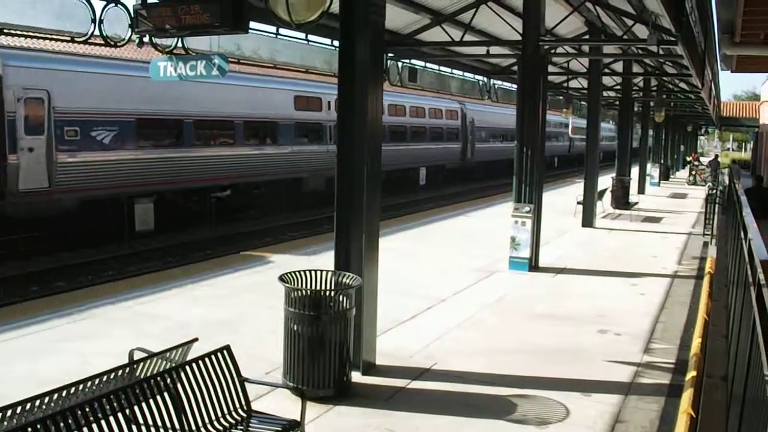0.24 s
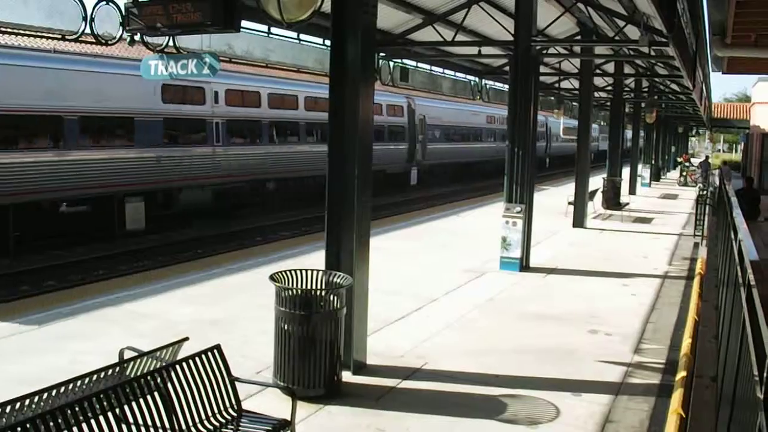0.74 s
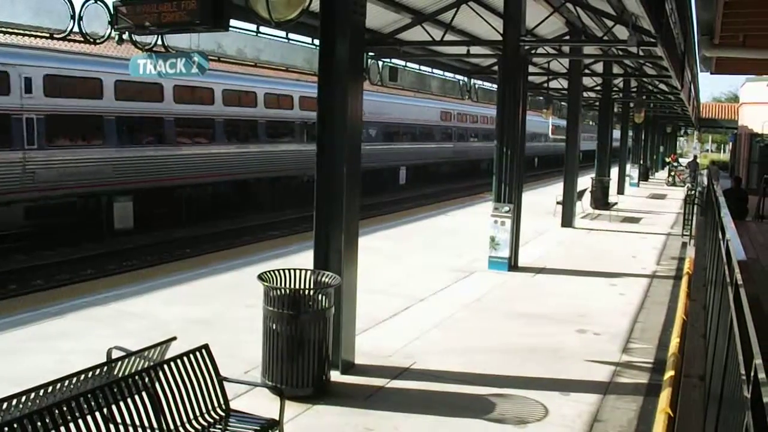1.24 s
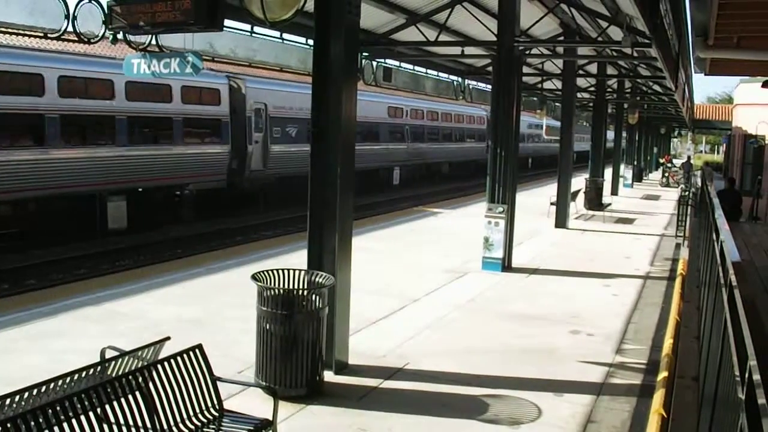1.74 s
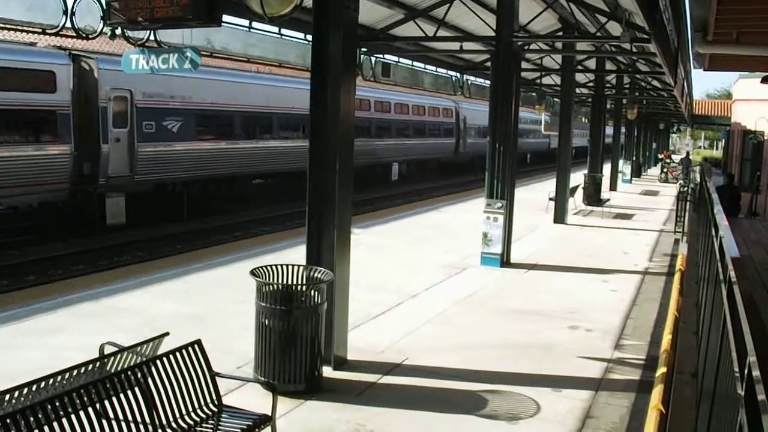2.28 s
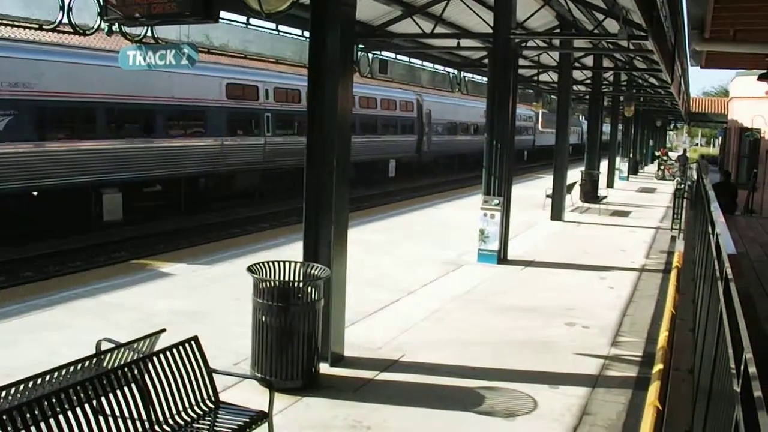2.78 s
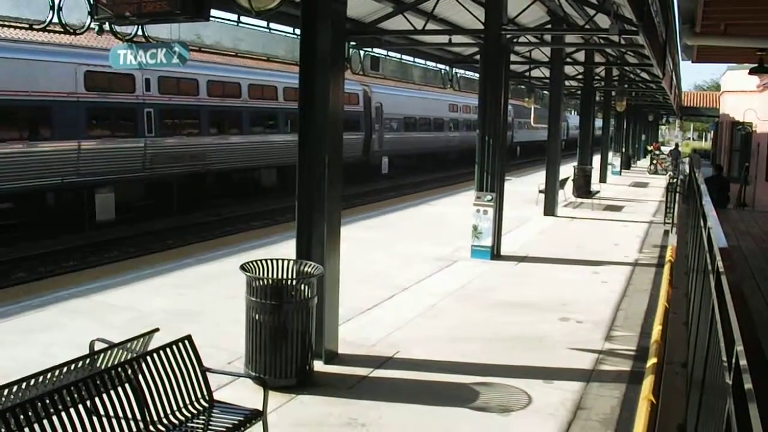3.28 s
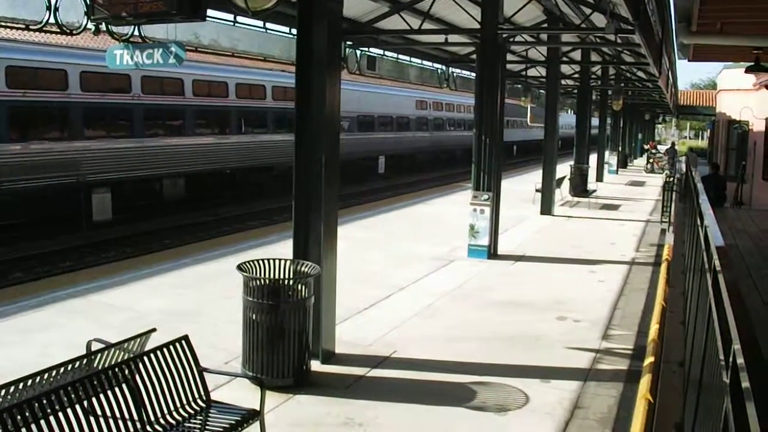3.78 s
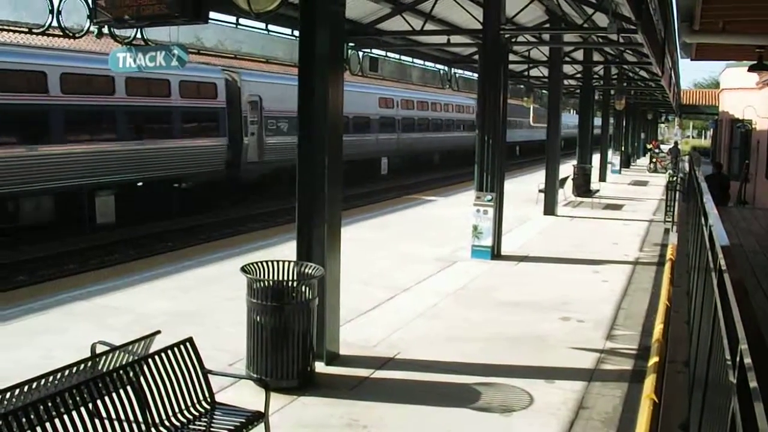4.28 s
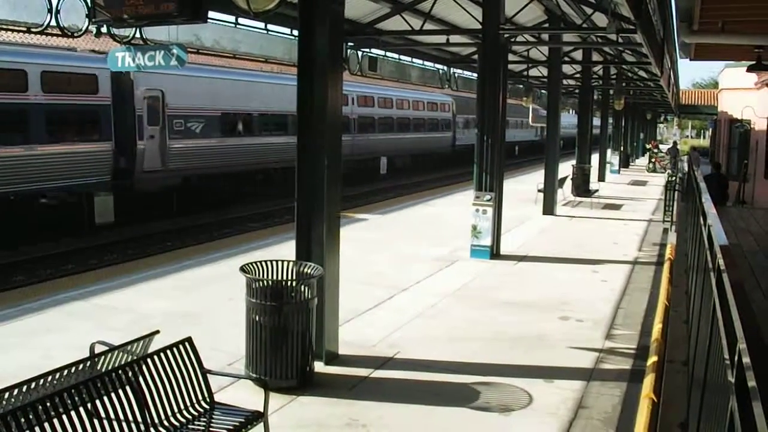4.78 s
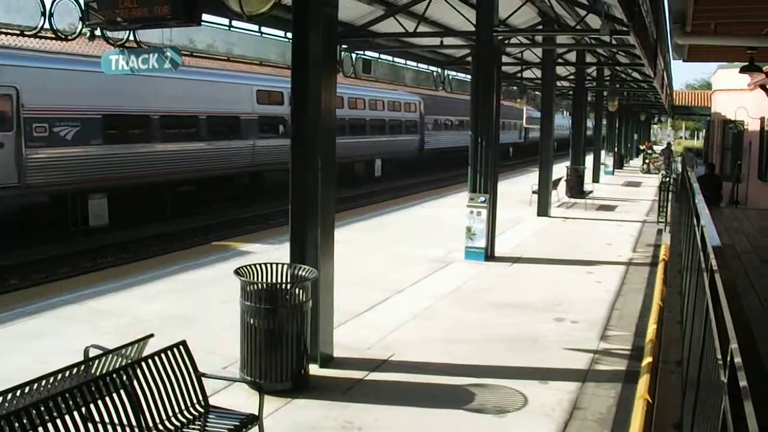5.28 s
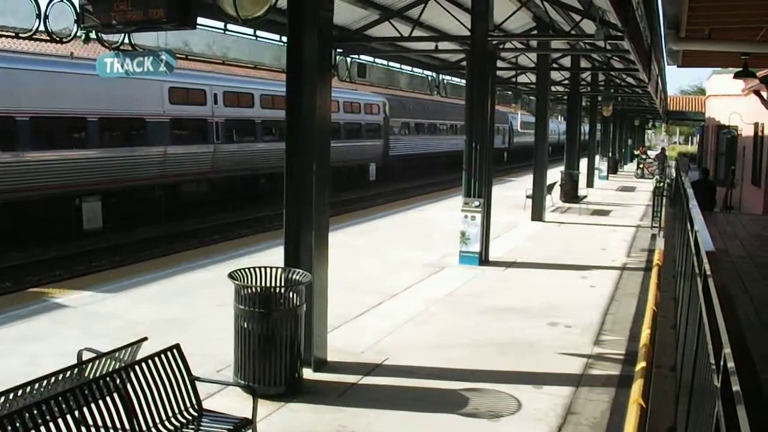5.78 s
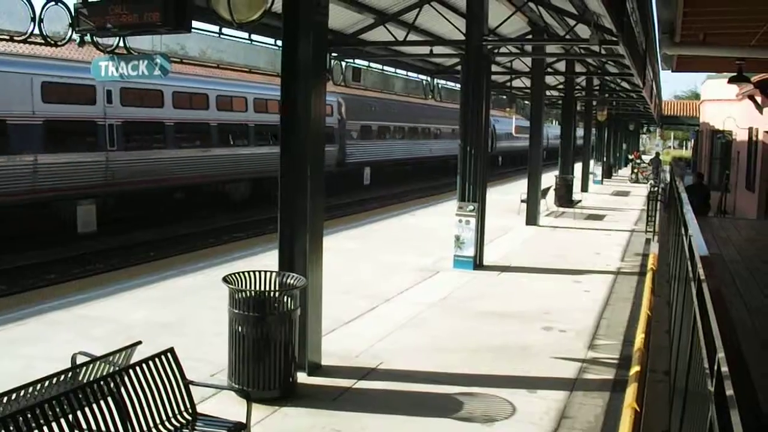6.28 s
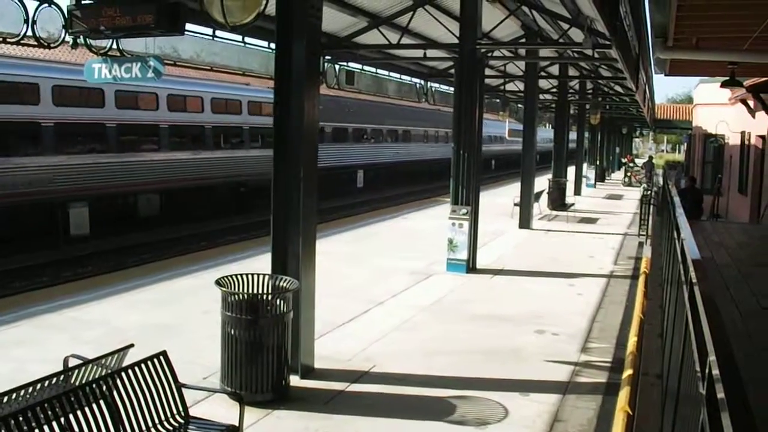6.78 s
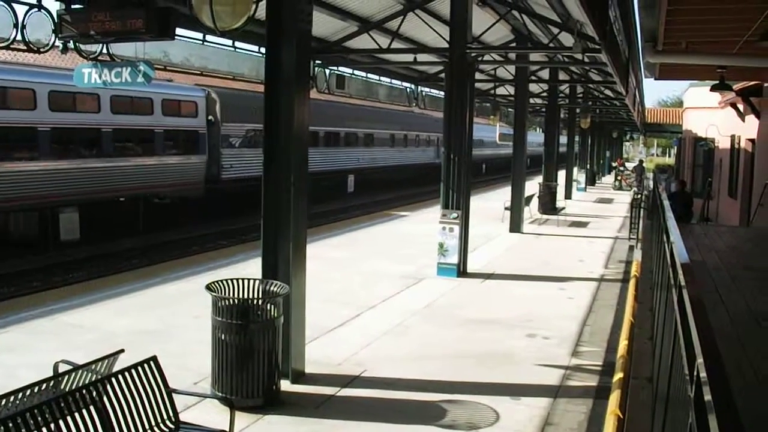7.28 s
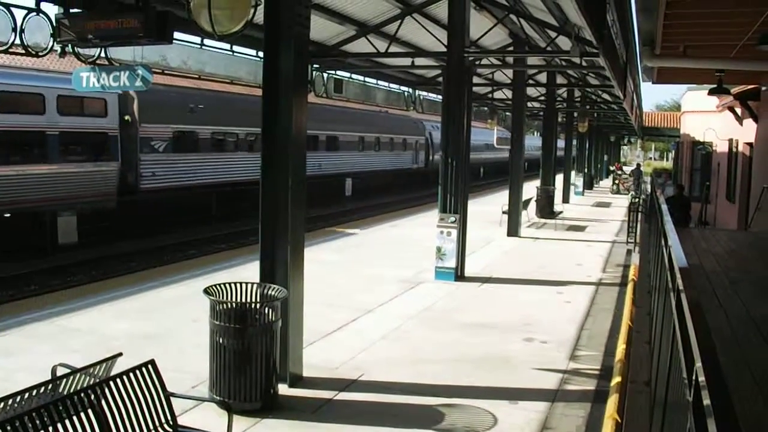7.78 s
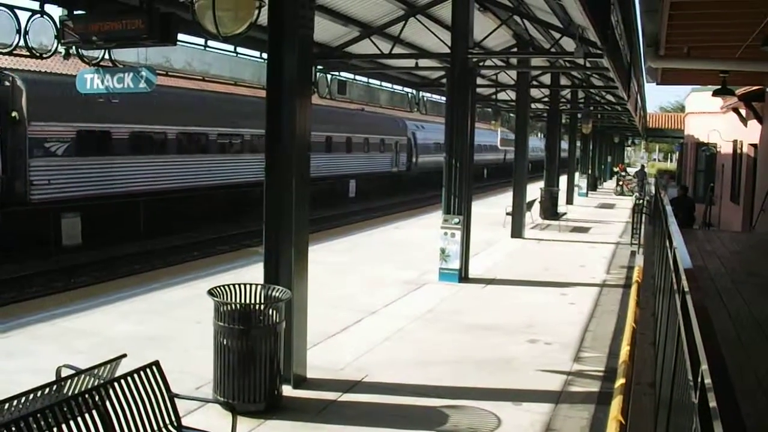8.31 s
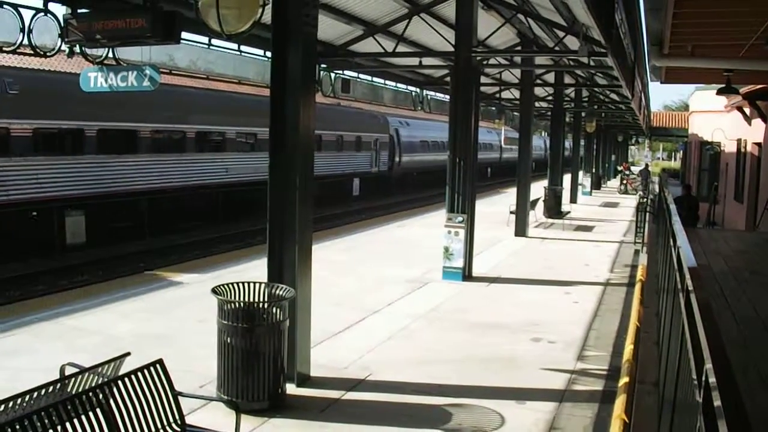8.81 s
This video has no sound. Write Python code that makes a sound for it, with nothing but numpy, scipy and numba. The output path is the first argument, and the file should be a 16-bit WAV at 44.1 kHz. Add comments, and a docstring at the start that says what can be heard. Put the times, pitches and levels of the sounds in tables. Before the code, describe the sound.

Close beside an open station platform, a passenger train rolls past with broad wheel hiss and low thumping rumble. Metallic brake ringing and short thin chirps come first; a piercing squeal bursts in after about a second, then several wavering squeals build into a dense, rough screech with sharp clicks. The rolling noise fades while the screech stays loud to the end. Handheld microphone, nearly mono, strained by the loudness.

```python
"""Wheels hiss and rumble on the rails while a passenger train brakes and its discs ring and squeal.
Wheels are coloured noise; discs, squeals and pads are wavering tones with a rough edge.
Single discs lock into squeals and chirps; later a dense band of squeaking pads with clicking slips takes over.
Sudden dips, a stepping limiter and a slightly late left treble shape the sound, heard on two channels."""
import sys
import numpy as np
from scipy import signal
from scipy.fft import rfft, irfft, next_fast_len
from scipy.io import wavfile
from scipy.ndimage import uniform_filter1d
from numba import njit

SR = 44100
rng = np.random.default_rng(int(sys.argv[2]) if len(sys.argv) > 2 else 0)


def store_pcm(level_fs):
    """Save levels as 16-bit WAV."""
    pcm = np.round(np.clip(level_fs, -1, 1) * 32767).astype(np.int16)
    wavfile.write(sys.argv[1], SR, np.atleast_2d(pcm).T)


N = 399105
TIME = np.arange(N) / SR

# Loudness of the squeaking pads. Each row: time in seconds, level in dB.
PAD_LEVEL = [(0, -53), (.55, -33), (1.1, -30.5), (2.2, -29.5), (3.4, -20.5), (3.9, -19.5), (5.4, -17.5),
             (6.3, -19.5), (6.55, -15), (7.6, -15), (7.95, -16.5), (8.5, -15.5), (9.05, -17.5)]
# Where the squeaks lie in pitch. Each row: frequency in Hz, relative strength in dB per Hz.
PAD_BAND = [(2560, -38.5), (2720, -2.5), (2850, 0.5), (3050, -4), (3300, 2), (3700, 0), (4000, -4.5),
            (4350, -12.5), (4600, -28.5), (4720, -40.5)]


def undb(db):
    """Turn decibels into an amplitude factor."""
    return 10 ** (np.asarray(db) / 20)


def unit(x):
    """Scale a signal to an average strength (rms) of 1."""
    return x / np.sqrt(np.mean(np.abs(x) ** 2))


def read(table):
    """Draw each column of a table as a curve over time; the end values are held."""
    s, *columns = np.transpose(table)
    return [np.interp(TIME, s, c) for c in columns]


def walk(rate):
    """Smooth chance curve that changes about rate times a second, with a spread of 1."""
    # made at a sixteenth of the sample rate, smoothed three times, then filled in
    size = max(int(SR / 16 / rate), 1)
    x = rng.standard_normal(N // 16 + 2)
    for _ in range(3):
        x = uniform_filter1d(x, size)
    return np.interp(np.arange(N) / 16, np.arange(len(x)), unit(x))


def noise(gain_at, source=None):
    """Noise (or another source) whose frequencies are weighted by gain_at(Hz), at rms 1."""
    size = next_fast_len(N)
    hz = np.maximum(np.arange(size // 2 + 1) * SR / size, 1)
    source = rng.standard_normal(size) if source is None else source
    spectrum = rfft(source, size) * gain_at(hz)
    return unit(irfft(spectrum, size)[:N])


def colour(points, hz):
    """Amplitude at hz of a spectrum given as (Hz, dB) points; practically silent beyond its ends."""
    f, db = np.transpose(points)
    return undb(np.interp(np.log(hz), np.log(f), db, -120, -120))


def squeak(hz, width_hz, clean, over_db):
    """Stick-slip on one mode: a tone that partly loses its phase, with the octave of its lopsided cycle."""
    # a steady part (clean) plus a part that wanders about width_hz times a second
    z = clean + walk(width_hz) + 1j * walk(width_hz)
    z = unit(z) * np.exp(2j * np.pi * np.cumsum(hz) / SR)
    octave = z * z / (np.abs(z) + 1e-9)
    return np.sqrt(2) * (z + undb(over_db) * octave).real


def wheels():
    """Hiss in octave bands that flicker alone, over the thumping rumble of the bogies."""
    # Each row: time in seconds, wheel hiss level in dB, rumble level in dB.
    rolling = [(0, -19.5, -18.5), (.7, -21, -18.5), (1.2, -20.5, -20), (1.7, -19.5, -21), (2.2, -24, -25.5),
               (3, -22.5, -23), (3.8, -23, -24.5), (4.4, -24.5, -26.5), (5, -26.5, -27.5),
               (5.6, -30.5, -30), (6.2, -34, -34.5), (6.6, -30.5, -31.5), (7.2, -34, -35.5),
               (7.85, -36, -34), (8.05, -38.5, -35.5), (8.6, -40.5, -38.5), (9.05, -42.5, -41)]
    # Hiss, then rumble spectrum. Each row: frequency in Hz, relative strength in dB per Hz.
    hiss_band = [(150, -30), (250, -4), (340, -5), (520, -3.5), (750, -6.5), (1250, -4.5), (2100, -7),
                 (3040, -3.5), (3860, -7.5), (4680, -9.5), (5860, -22.5), (6340, -20), (7100, -22.5),
                 (7810, -23), (10300, -34.5), (11500, -67.5), (14900, -93)]
    rumble_band = [(11, -47.5), (18, 2), (38, -14), (75, 2.5), (114, -2.5), (145, -1.5), (193, -1.5),
                   (235, -7), (271, -4), (329, -19), (400, -27), (520, -36.5), (880, -120)]
    # Low thumps that swell the rumble. Each row: time in seconds, rise in dB.
    thumps = [(1.02, 4.4), (1.55, 4.6), (2.55, 6.4), (3.47, 5), (3.88, 9.7), (4.43, 6), (4.58, 5),
              (5.5, 4.1), (6.2, 12), (6.57, 6.6), (8.3, 4), (8.93, 5.8)]
    thump_s = .018  # sets the length of a swell, in seconds

    hiss_db, rumble_db = read(rolling)
    grid = np.arange(20., SR / 2, 20.)
    hiss = 0
    for centre in 250 * 2. ** np.arange(6):
        # neighbouring bands overlap and fade into each other
        share = lambda hz: np.cos(np.pi / 2 * np.clip(np.log2(hz / centre), -1, 1))
        weight = np.sqrt(np.sum((colour(hiss_band, grid) * share(grid)) ** 2))
        band = noise(lambda hz: colour(hiss_band, hz) * share(hz))
        hiss = hiss + weight * undb(.36 * walk(11.6)) * band
    thump_db = sum(db * np.exp(-((TIME - s) / thump_s) ** 2) for s, db in thumps)
    rumble = undb(1.1 * walk(16)) * noise(lambda hz: colour(rumble_band, hz))
    return undb(hiss_db + .83 * walk(27)) * unit(hiss) + undb(rumble_db + thump_db) * rumble


def discs():
    """Rubbing noise rings every disc mode; each wavers in level and pitch; they die away as the train slows."""
    # Ways a disc can ring. Each row: frequency in Hz, relative width in Hz, relative level in dB.
    modes = [(2960, 370, -8), (3830, 240, -3), (4190, 48, -3), (4366, 170, -5.5), (4920, 150, -9.5),
             (5196, 130, -9.5), (5575, 360, -10), (5860, 210, -20), (7010, 480, -12.5), (8560, 1200, -24),
             (10460, 900, -37.5)]
    # Loudness of all the ringing. Each row: time in seconds, level in dB.
    ring_level = [(0, -20), (.9, -19.5), (1.35, -20), (1.65, -20.5), (2, -25), (2.5, -24.5), (3.05, -26),
                  (3.5, -35), (4.1, -45), (4.8, -42.5), (5.6, -40.5), (6.4, -45), (9.05, -79.5)]
    ring = 0
    for hz, width, db in modes:
        wander = hz * (1 + .006 * walk(2.5))
        tone = squeak(wander, 1.5 * width, clean=.29, over_db=-58)
        # wider modes carry more sound
        ring = ring + undb(db + 2 * walk(11)) * np.sqrt(width) * tone
    return undb(read(ring_level)[0] + .81 * walk(9.7)) * unit(ring)


def pads():
    """Many pads squeak side by side in pitch, each coming and going; all sink in pitch as the train slows."""
    # Octave of a squeak. Each row: squeak frequency in Hz, octave level against the squeak in dB.
    octave_level = [(2500, -39), (2900, -23), (3300, -25.5), (3750, -17), (4300, -12), (4800, -13.5)]
    sink = 1.04 - .005 * TIME
    crowd = 0
    for hz in np.geomspace(PAD_BAND[0][0], PAD_BAND[-1][0], num=30):
        over_db = np.interp(hz, *np.transpose(octave_level))
        drift = sink * (1 + .008 * walk(1.5))
        # higher squeaks lie further apart in Hz, so each stands for a wider slice
        strength = colour(PAD_BAND, hz) * np.sqrt(hz)
        crowd = crowd + strength * undb(2.8 * walk(8)) * squeak(hz * drift, 260, .62, over_db)
    # grip comes and goes quickly for all pads together
    return undb(read(PAD_LEVEL)[0] + 1.5 * walk(27)) * unit(crowd)


def slips():
    """All pads slip together: a hail of small random jolts in their band, plus set hard ones of a few cycles."""
    # The hardest slips. Each row: time in seconds, peak level in dB.
    jolts = [(3.275, -4.5), (3.944, -4), (4.594, -6), (4.957, -1.5), (5.118, -8), (5.252, -9), (5.396, -13),
             (5.623, -2), (6.642, -9.5), (6.813, 1), (7.293, -5), (7.571, -9), (7.578, -1.5), (7.743, -5),
             (7.821, -9), (7.934, 0), (8.191, -6), (8.288, -18), (8.402, -7), (8.571, -4), (8.686, -4),
             (8.718, -5.5), (8.870, -6.5), (8.952, -9)]
    slips_per_s, spread_db, small_db = 400, 2, -8  # small_db is set against the pad level
    jolt_hz, jolt_s = 3400, .0004
    when, size, sign = rng.random((3, N))
    # most small slips are weak, a few much stronger; each pushes up or down
    small = (when < slips_per_s / SR) * undb(-spread_db * np.log(1 - size)) * np.sign(sign - .5)
    hard = 0
    for s, db in jolts:
        swell = np.exp(-((TIME - s) / jolt_s) ** 2)
        hard = hard + undb(db) * swell * np.cos(2 * np.pi * jolt_hz * (TIME - s))
    return undb(read(PAD_LEVEL)[0] + small_db) * noise(lambda hz: colour(PAD_BAND, hz), small) + hard


def squeal(pitch, table, width_hz, clean, over_db, flutter_db):
    """One disc sings while its level table lasts; pitch and grip waver."""
    hz = read(pitch)[0] * (1 + .003 * walk(9.25))
    start, end = table[0][0], table[-1][0]
    on = np.interp(TIME, [start - .06, start, end, end + .27], [0, 1, 1, 0])
    flutter = unit(undb(flutter_db * walk(9.2)))
    return on * flutter * undb(read(table)[0]) * squeak(hz, width_hz, clean, over_db)


def squeals():
    """Single discs lock into stick-slip, each with its own pitch path, purity and flutter."""
    # Pitch of each squeal. Each row: time in seconds, frequency in Hz.
    low_hz, mid_hz, high_hz = [(0, 3095), (1, 3090), (2.2, 3055), (3.4, 3022), (4.4, 2993), (5.8, 2958),
                               (6.2, 2938), (6.6, 2906), (7.4, 2865), (8.2, 2872), (9.05, 2852)], [(0, 3862), (.6, 3835), (1, 3780), (1.4, 3727), (1.75, 3720),
                                               (1.85, 3665), (1.95, 3705), (2.1, 3665), (2.22, 3700),
                                               (2.4, 3632), (3, 3642), (3.4, 3620), (3.8, 3668),
                                               (4.2, 3648), (6.9, 3628)], [(0, 7055), (.6, 6987), (1, 6915),
                                                               (1.4, 6869), (2.2, 6806), (5.1, 6793)]
    brief_hz, late_hz = [(1.1, 4385), (1.8, 4393), (3.2, 4380)], [(4.9, 3402), (5.9, 3398), (6.2, 3360), (6.6, 3337), (7.4, 3316),
                                           (8, 3314)]
    side_hz, faint_hz = [(2.6, 2900), (4, 2893), (5.4, 2915)], [(3.2, 4740), (4.6, 4715), (5.2, 4737), (7.1, 4580), (8, 4590)]
    # Loudness of each squeal. Each row: time in seconds, level in dB.
    low, mid, high = [(0, -43), (.95, -32.5), (1.4, -26.5), (2, -21), (2.7, -21.5), (3.1, -20), (3.9, -16),
                      (4.3, -18.5), (4.6, -13), (5.3, -13.5), (5.65, -11.5), (6.3, -17), (6.8, -14.5),
                      (7.55, -16.5), (8, -17), (8.5, -16.5), (9.05, -20.5)], [(0, -25.5), (.7, -26), (1.17, -28), (1.34, -11), (1.72, -32.5),
                                          (1.85, -8), (1.91, -16.5), (2.05, -13.5), (2.4, -13),
                                          (2.75, -16.5), (2.83, -28), (2.97, -19), (3.11, -26),
                                          (3.2, -16.5), (3.55, -19), (3.75, -26), (4, -21.5), (4.55, -25),
                                          (5, -27.5), (5.65, -30), (6.3, -29), (6.55, -20.5), (6.9, -25)], [(0, -36), (.3, -28), (.9, -28), (1.5, -21),
                                                              (2, -29), (2.45, -32.5), (2.9, -37),
                                                              (3.6, -44), (4.3, -58), (5.1, -57)]
    brief, late, beside = [(1.1, -38), (1.4, -40), (1.5, -29), (1.78, -25), (1.9, -38), (2.3, -45),
                           (2.6, -33), (3, -31), (3.2, -32.5)], [(4.9, -29), (5.25, -25), (5.45, -13.5), (5.7, -18),
                                                 (6.3, -29.5), (6.8, -24), (7.3, -29.5), (8, -23)], [(2.6, -24), (3.1, -25.5), (3.75, -37),
                                                                      (3.95, -16.5), (4.5, -30), (4.8, -31),
                                                                      (5.1, -22), (5.4, -25)]
    # The faint squeal has separate parts, each a list of the same kind of rows.
    faint_parts = [
        [(3.2, -42), (3.4, -36), (4.1, -33), (4.4, -37), (5.2, -39)],
        [(7.05, -51), (7.2, -38), (7.4, -52), (7.9, -43), (8, -56)],
    ]

    # the numbers are width_hz, clean, over_db and flutter_db
    sings = squeal(low_hz, low, 200, 1.08, -34, 2.1)
    sings += squeal(mid_hz, mid, 150, 1.7, -45, 1.8)
    sings += squeal(high_hz, high, 300, 1.1, -54.5, 1.8)
    sings += squeal(brief_hz, brief, 90, 1.5, -36, 3.5)
    sings += squeal(late_hz, late, 60, .63, -37, 4.4)
    sings += squeal(side_hz, beside, 90, .61, -39, 3)
    sings += sum(squeal(faint_hz, part, 200, .51, -42, 3) for part in faint_parts)
    return sings


def chirps():
    """A thin squeal that only locks on in short chirps."""
    # Each row: start in seconds, length in seconds, level in dB.
    chirp_list = [(.05, .3, -29), (0.474, .06, -29.5), (.86, 0.27, -25), (1.22, 0.063, -32),
                  (3.303, 0.13, -37), (3.42, 0.16, -32.5), (3.66, 0.089, -32), (3.82, 0.075, -37),
                  (4.055, 0.069, -37), (4.216, .2, -34.5), (4.46, .05, -43), (5.0, .2, -37.5),
                  (5.42, .1, -41), (5.63, 0.11, -39)]
    # Pitch of the thin squeal. Each row: time in seconds, frequency in Hz.
    thin_pitch = [(0, 5910), (1, 5860), (1.3, 5785), (3.2, 5846), (5.9, 5857)]
    rise_s, fall_s = .038, .07
    gate = 0
    for s, length, db in chirp_list:
        corners = [s - rise_s, s, s + length, s + length + fall_s]
        gate = gate + undb(db) * np.interp(TIME, corners, [0, 1, 1, 0])
    hz = read(thin_pitch)[0] * (1 + .0026 * walk(9))
    return gate * undb(2.1 * walk(9.2)) * squeak(hz, 200, clean=.8, over_db=-47)


def whistle():
    """A high whistle, loudest at one spot of each turn of the slowing wheel."""
    # Each row: time in seconds, level in dB at the top of a throb.
    throb_level = [(0, -58), (.45, -42), (1.2, -40), (1.9, -40), (2.3, -53), (2.8, -43), (3.1, -56),
                   (3.4, -47), (4.2, -57)]
    turns_per_s, slowing_per_s2 = 4.05, .15  # starting speed, and how much of it is lost each second
    loud_at_turn, depth_db = .77, 20
    turns = turns_per_s * TIME - slowing_per_s2 * TIME ** 2 / 2
    throb_db = depth_db * (np.cos(2 * np.pi * (turns - loud_at_turn)) - 1) / 2
    return undb(throb_db) * squeal([(0, 9700)], throb_level, 600, .3, -85, 2.7)


def knock():
    """A dull metal knock: a short burst of noise in a broad resonance around 1900 Hz."""
    # Each row: time in seconds, starting level in dB.
    knock_list = [(8.718, -33)]
    shape = sum(undb(db) * np.exp(-np.maximum(TIME - s, 0) / .004) * (TIME >= s) for s, db in knock_list)
    return shape * noise(lambda hz: 1 / (1 + ((hz - 1900) / 600) ** 4))


def floor():
    """A low drone and a faint patchy hiss at the top, both coloured noise, stay under everything."""
    # Drone, then top hiss spectrum. Each row: frequency in Hz, relative strength in dB per Hz.
    drone_band = [(16, -20.5), (25, 2.5), (90, 5), (130, -20.5)]
    air_band = [(8000, -8.5), (9800, 1.5), (11500, -10.5), (13000, -14.5), (15500, -18.5)]
    drone = undb(-42) * noise(lambda hz: colour(drone_band, hz))
    return drone + undb(-55.5 + 2 * walk(12)) * noise(lambda hz: colour(air_band, hz))


def dips():
    """Gain that changes suddenly, mostly downward, and creeps back, with a quick flicker on top."""
    # Each row: time in seconds, nominal depth in dB (below zero is a rise); the return trims it a little.
    dip_list = [(.19, 1), (.43, 0.5), (.93, 3.5), (1.28, 3.5), (1.84, 6), (1.989, 1.5), (2.28, 1.5),
                (2.381, -2), (2.56, 5), (2.99, -3.5), (3.07, 4.5), (3.6, -3.5), (4.11, 6.5), (4.46, 0.5),
                (4.612, 8.5), (4.92, 8), (5.23, 4), (5.53, 4.5), (5.73, 1.5), (6.23, 4), (6.64, 2.5),
                (6.82, 3), (7.19, 1), (7.94, 1.5), (8.04, 4), (8.32, 3), (8.6, 2.5), (8.74, 2)]
    drop_s, creep_s = .0072, .14  # time constants of the change and of the return
    db = 0
    for s, depth_db in dip_list:
        since = np.maximum(TIME - s, 0)
        db = db - depth_db * (1 - np.exp(-since / drop_s)) * np.exp(-since / creep_s)
    return undb(db + .78 * walk(31))


def scene():
    """Add all sources; the dips act on all but the knock and the slips."""
    train = wheels() + discs() + pads() + squeals() + chirps() + whistle()
    mono = dips() * (train + floor()) + knock() + slips()
    return np.array([mono, mono])


@njit
def limiter(x, top, step, gap, release):
    """A peak over top knocks the gain down, the more the higher it is, which ticks; the gain then creeps back."""
    y, g, aim, last = np.empty(len(x)), 1., 1., 0
    for i in range(len(x)):
        y[i] = g * x[i]
        # knocks lie more than gap samples apart
        if abs(y[i]) > top and i - last > gap:
            aim, last = aim * step * top / abs(y[i]), i
        aim += (1 - aim) * release
        g += (aim - g) / 3
    return y


def record(dry):
    """Stepping limiter, a hard ceiling, a slightly late left treble, the cut at the top."""
    step_db, release_s = -.7, .06
    held = limiter(1.149 * dry[0], .72, undb(step_db), 6, 1 / (release_s * SR))
    held = np.clip(held, -1, 1)
    late = np.append(0, held[:-1])
    # the left channel is one sample late, but the bass is the same on both
    treble = signal.butter(2, 1600, "high", fs=SR, output="sos")
    side = signal.sosfiltfilt(treble, late - held, padtype="even") / 2
    pair = (late + held) / 2 + np.array([side, -side])
    top_cut = signal.ellip(8, .2, 70, 15800, fs=SR, output="sos")
    return np.clip(signal.sosfilt(top_cut, pair), -1, 1)


dry = scene()
out = record(dry)
store_pcm(out)
```